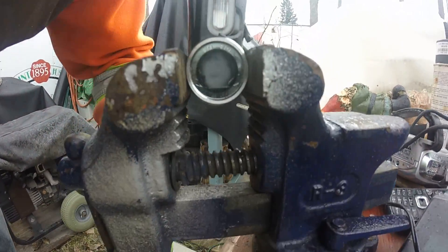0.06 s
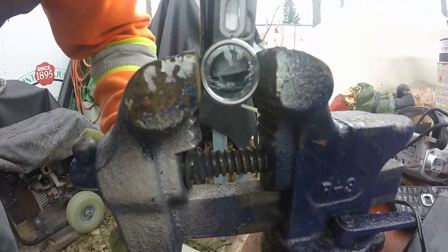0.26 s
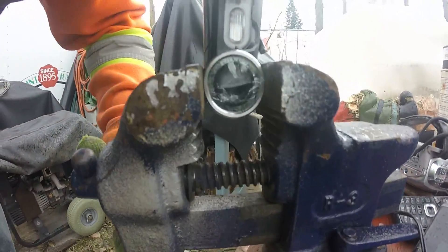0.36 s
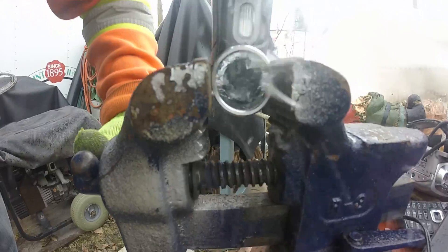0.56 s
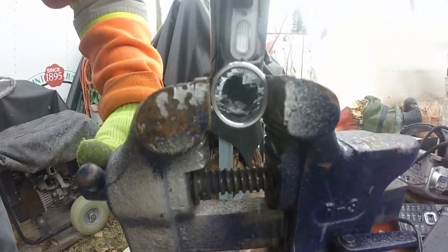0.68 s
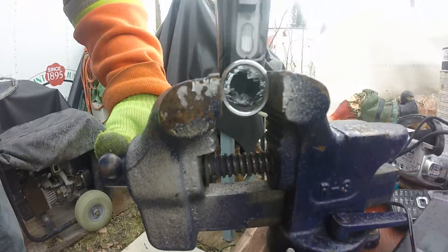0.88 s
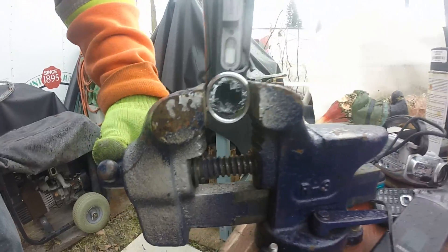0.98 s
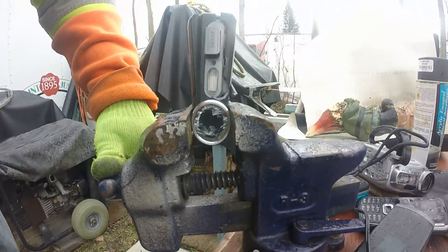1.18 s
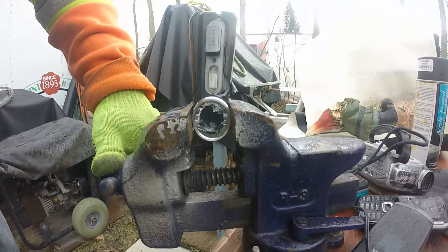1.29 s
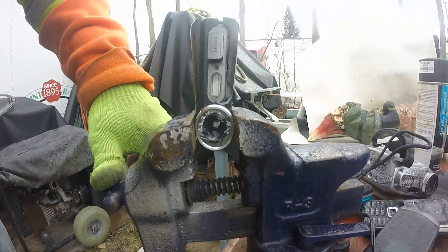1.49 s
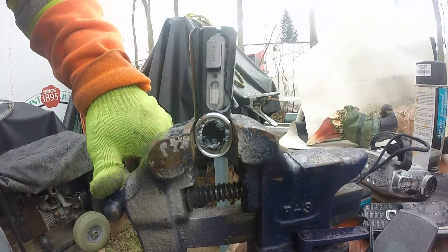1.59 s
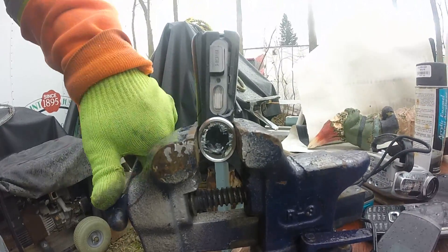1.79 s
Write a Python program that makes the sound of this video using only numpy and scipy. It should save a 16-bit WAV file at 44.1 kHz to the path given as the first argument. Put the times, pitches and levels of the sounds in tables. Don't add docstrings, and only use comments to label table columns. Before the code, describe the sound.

A camera lens barrel snaps and splinters in a metal vise, loose glass ticking, faint outdoor murmur

```python
import sys
import numpy as np
from scipy import signal
from scipy.fft import rfft, irfft, next_fast_len
from scipy.io import wavfile
from scipy.ndimage import map_coordinates

SR = 44100
rng = np.random.default_rng(int(sys.argv[2]) if len(sys.argv) > 2 else 0)


def to_linear_factor(level_db):
    exponent = np.asarray(level_db, float) / 20
    return 10 ** exponent


def waveform_to_disk(signal):
    frames = np.transpose(np.atleast_2d(signal))
    scaled = np.clip(frames, -1, 1) * 32767
    samples = np.round(scaled).astype(np.int16)
    wavfile.write(sys.argv[1], SR, samples)


N = 81585
T = np.arange(2048) / SR
LEAD_S = 0.0003


def unit(x):
    return x / np.sqrt(np.mean(x ** 2) + 1e-20)


def decay(t, t60):
    return to_linear_factor(-60 * t / t60)


def filtered(x, response):
    size = next_fast_len(x.shape[-1] + 8192)
    spectrum = rfft(x, size) * response(np.fft.rfftfreq(size, 1 / SR))
    return irfft(spectrum, size)[..., :x.shape[-1]]


def coloured(points, size):
    hz, db = np.transpose(points)
    noise = rng.standard_normal(size)
    return unit(filtered(noise, lambda f: to_linear_factor(np.interp(np.log(f + 1), np.log(hz + 1), db))))


def resonate(x, modes):
    def response(f):
        total = 0
        for k, (centre, width, db) in enumerate(modes):
            damping = 1j * f * width
            total = total + (-1) ** k * to_linear_factor(db) * damping / (centre * centre - f * f + damping)
        return total
    return filtered(x, response)


def add(track, start, db, sound):
    track[round(start * SR):][:len(sound)] += to_linear_factor(db) * sound / np.abs(sound).max()


def burst(t60, hold=0.):
    snap = 3.9 * (T == 0)
    return (rng.standard_normal(len(T)) + snap) * decay(np.maximum(T - hold, 0), t60)


# time in seconds, level in dB.
YARD_GAIN = [(0.0, -49.5), (0.107, -47), (0.236, -51.5), (0.293, -66), (0.52, -59), (0.675, -62),
             (0.952, -59.5), (1.292, -53.5), (1.592, -47.5), (1.85, -49.5)]


def gain_db():
    return np.interp(np.arange(N) / SR, *np.transpose(YARD_GAIN))


# frequency in Hz, level in dB.
MURMUR = [(12, -28.5), (20, -2.5), (92, -3), (196, -4), (427, -14), (700, -10), (1070, -23), (1600, -44.5)]
# frequency in Hz, density in dB per Hz.
HISS_COLOUR = [(600, -20), (1100, 0), (2500, -4), (5200, -12.5), (6600, -13.5), (9000, -25), (12500, -28),
               (15500, -48)]


def yard():
    lumps = map_coordinates(rng.standard_normal(40), [np.arange(N) * 14 / SR])
    murmur = coloured(MURMUR, N) * to_linear_factor(2.0 * lumps)
    hiss = coloured(HISS_COLOUR, N) * to_linear_factor(-14.5 + 0.6 * lumps)
    return to_linear_factor(gain_db()) * (murmur + hiss)


# start in seconds, length in seconds, level in dB, centre in Hz.
SLIDES = [(0.214, 0.02, -51, 2520), (0.25, 0.06, -57, 2120), (0.285, 0.017, -57, 8950),
          (0.483, 0.018, -59, 1870), (0.653, 0.036, -52, 1457), (0.678, .02, -56.5, 5030),
          (0.8, 0.017, -71, 3000), (0.985, 0.036, -62.5, 2500), (1.089, 0.021, -64, 2503),
          (1.121, 0.062, -63.5, 2098), (1.194, 0.018, -65.5, 4040), (1.231, 0.014, -63.5, 2460),
          (1.32, 0.015, -58.5, 2960), (1.333, 0.015, -66, 9970)]


def scrapes():
    out = np.zeros(N + SR)
    grit_db, q, size = 6.5, 0.77, 4096
    for start, length, db, hz in SLIDES:
        u = np.arange(size) / SR / length
        grit = to_linear_factor(grit_db * map_coordinates(rng.standard_normal(70), [np.arange(size) / 64]))
        mode = [(hz, hz / q, 0)]
        noise = unit(resonate(resonate(grit * rng.standard_normal(size), mode), mode))
        swell = np.minimum(8 * u, 1) * np.exp(-2 * u ** 2)
        out[round(start * SR):][:size] += to_linear_factor(db) * noise * swell
    return out[:N]


# start in seconds, peak level in dB.
NUDGES = [(.981, -58.5), (0.987, -57), (1.2735, -59), (1.324, -49.5), (1.3318, -36.5), (1.382, -53),
          (1.3989, -45), (1.4945, -34.5), (1.502, -59.5), (1.5348, -49.5), (1.6155, -47.5), (1.627, -58),
          (1.661, -59.5), (1.667, -53), (1.6875, -54.5), (1.7825, -56), (1.823, -65.5)]
# frequency in Hz, width in Hz, level in dB.
GLASS_MODES = [(6560, 416, 4), (9770, 540, -13.5), (12330, 900, -17)]


def chinks():
    out = np.zeros(N + SR)
    for start, db in NUDGES:
        contact = burst(0.0023) + 8 * (T == 0)
        ring = resonate(contact, GLASS_MODES)
        add(out, start - LEAD_S, db, resonate(ring, [(8000, 9000, 0)]))
    return out[:N]


# frequency in Hz, width in Hz, level in dB.
BARREL_MODES = [(1390, 830, -7.5), (2190, 800, -12), (3256, 660, -3.5), (5410, 450, 1), (6500, 1100, -7.5),
                (9410, 1140, -7.5), (12850, 2400, -9.5)]


def leaning(hz, db_per_oct):
    return [(c, w, db - db_per_oct * abs(np.log2(c / hz))) for c, w, db in BARREL_MODES]


def faint_crackle():
    level, ticks = gain_db(), []
    for when, chance, pitch in rng.random((110, 3)):
        db = level[int(when * N)] - 13 - 1.5 * np.log(chance)
        ticks.append((when * N / SR, db, 2000 * 6.6 ** pitch))
    return ticks


# start in seconds,
# peak level in dB, pitch in Hz.
SPLINTER_TICKS = [(0.1781, -29, 12000), (0.1835, -31.5, 9300), (0.262, -30.5, 9350), (0.2799, -39, 10200),
                  (0.2849, -33, 10240), (0.2891, -44, 5420), (0.3105, -57, 10270), (0.3149, -57, 9400),
                  (0.3367, -61, 5510), (0.3492, -63, 9330), (0.3587, -47.5, 3460), (0.3905, -40, 9330),
                  (0.456, -51.5, 6260), (0.4876, -33, 9350), (0.533, -52, 4800), (0.5526, -45, 9260),
                  (0.5892, -44.5, 9230), (0.6797, -44.5, 4320), (0.6886, -47.5, 4720), (0.7043, -56, 4160),
                  (0.7251, -48.5, 8870), (0.7379, -58, 3110),
                  (0.805, -58.5, 2850), (0.9358, -54, 3400), (0.9807, -57.5, 2802), (0.9874, -54, 2590),
               (1.0074, -48, 2056), (1.0582, -57.5, 2020), (1.0931, -53, 2020), (1.1257, -45.5, 1790),
               (1.1354, -45, 1867), (1.1506, -50, 2705), (1.1596, -48, 5390), (1.166, -45, 5020),
               (1.2002, -51, 5040), (1.2131, -52, 5054), (1.2355, -43, 1940), (1.2511, -55, 5810),
               (1.279, -46, 5800), (1.313, -49, 5770), (1.3255, -56, 9720), (1.3326, -52, 9500),
               (1.4386, -42, 2120), (1.5757, -56, 8010), (1.576, -52.5, 12000), (1.338, -52, 10500),
               (1.313, -59, 13000), (1.016, -60, 10000), (1.0422, -61.5, 9000), (1.085, -60, 9600),
               (1.096, -58.5, 3520), (1.1135, -62, 5200), (1.119, -55.5, 5000), (1.125, -60, 5630),
               (1.369, -61, 11500), (1.39, -52, 1900), (1.251, -60, 11900), (1.238, -58, 4500),
                  (0.19, -46, 11000), (0.196, -33, 10600), (.2225, -37, 3300), (0.225, -36, 5550),
               (.2415, -49, 3000), (0.2683, -44.5, 3530), (.57, -64, 8000), (.58, -53, 9040),
               (.6265, -55, 6080), (.682, -61, 3467), (1.07, -60, 8006), (1.332, -43, 2697),
               (.2225, -44, 13500), (.2225, -38, 7500), (.229, -48.5, 9000), (0.2994, -56, 10000),
               (0.3585, -55, 9100), (.43, -59, 6830), (.533, -58.5, 2300), (.693, -57.5, 6180),
               (.7125, -64, 5600), (0.7252, -53.5, 3600), (0.7257, -54, 6000), (.6885, -49, 9010),
               (.798, -62, 9060), (.793, -61.5, 2003)]


def splinters():
    out = np.zeros(N + SR)
    q, partner, partner_db, body_db = 9, 0.68, -9, -8
    for start, db, hz in [*SPLINTER_TICKS, *faint_crackle()]:
        own = [(hz, hz / q, 0), (partner * hz, hz / q, partner_db)]
        body = [(c, w, g + body_db) for c, w, g in leaning(hz, 11)]
        add(out, start - LEAD_S, db, resonate(burst(0.0021), own + body))
    return out[:N]


# start in seconds, peak level in dB, extra first snap, bench ring in dB.
JAW_JOLTS = [
    (0.8379, -12, 11.8, -25),
    (1.422, -11.5, 6.1, -20),
]
# frequency in Hz, width in Hz, level in dB.
JAW_MODES = [
    [(1970, 230, -6.5), (2700, 300, -7), (3600, 190, -8.5), (4680, 290, 2), (6600, 610, -3),
     (7480, 260, -4), (8780, 400, -7.5), (11300, 610, -13), (13500, 850, -14.5)],
    [(701, 130, -2), (1590, 260, -1.5), (2500, 310, -3), (3700, 220, -7), (4520, 300, -6.5), (6300, 450, 0),
     (9360, 320, -7), (11500, 790, -17.5), (14300, 280, -36)],
]
# frequency in Hz, level in dB.
SCATTER_COLOUR = [(120, -35), (280, -17.5), (600, -9.5), (2500, -7.5), (5500, -11.5), (9000, -20),
                  (15500, -38)]


def jolts():
    out, t = np.zeros(N + SR), np.arange(SR // 4) / SR
    bench_hz, bench_t60, bench_rise_s = 982, 0.035, 0.0078
    for (start, db, snap, ring_db), modes in zip(JAW_JOLTS, JAW_MODES):
        add(out, start, db, resonate(burst(0.011, 0.00047) + snap * (T == 0), modes))
        swell = 1 - np.exp(-(t / bench_rise_s) ** 4)
        ring = decay(t, bench_t60) * np.sin(2 * np.pi * bench_hz * t) * swell
        add(out, start, db + ring_db, ring)
        fade = decay(t, 0.057) + to_linear_factor(-25) * decay(t, 0.23)
        add(out, start, db - 12, coloured(SCATTER_COLOUR, len(t)) * fade)
    return out[:N]


# start in seconds,
# peak level in dB, pitch in Hz, t60 in seconds.
STRUCK_RINGS = [(0.2026, -15, 747, 0.011), (.207, -26, 760, 0.016), (.2115, -21, 811, 0.013),
                (.2135, -18.5, 773, 0.012), (0.2446, -17, 1364, 0.0054), (.602, -31, 748, 0.013),
                (0.604, -8, 735, .012), (.6065, -25, 727, 0.0063), (.646, -21.5, 890, 0.013),
                (1.0938, -40.5, 589, 0.037), (1.123, -39.5, 617, 0.029), (.2025, -12.5, 1776, 0.007),
                (0.2028, -12.5, 2680, 0.0057), (0.6462, -13.5, 2330, 0.0058), (0.215, -34, 3260, .03),
                (0.231, -47, 850, 0.012), (0.246, -44.5, 3270, 0.035), (0.2678, -51, 720, 0.0207),
                (0.289, -65, 2500, 0.08), (.6535, -37, 700, .02), (0.67, -46, 516, 0.021),
                (1.209, -53, 698, .03), (.2447, -7, 5460, .005), (0.2454, -7, 5440, .005),
                (0.3908, -46, 6200, 0.0044), (0.4867, -41.5, 6300, 0.0053), (.842, -50, 260, 0.053),
                (1.4222, -38, 487, 0.021), (1.2, -53, 5000, 0.0059), (0.2022, -8, 12410, .002)]


def thumps():
    out = np.zeros(N + SR)
    for start, db, hz, t60 in STRUCK_RINGS:
        onset = 1 - np.exp(-T / 0.00057)
        add(out, start, db, -np.sin(2 * np.pi * hz * T) * decay(T, t60) * onset)
    return out[:N]


# start in seconds, peak level in dB, length in seconds, push 1 or pull -1.
AIR_PUFFS = [
    (0.2446, -20, 0.0016, 1),
    (.6048, -23, 0.003, -1),
    (0.6455, -25, 0.0012, -1),
    (.2105, -32, 0.0024, -1),
]


def puffs():
    out = np.zeros(N + SR)
    for start, db, length, way in AIR_PUFFS:
        u = T / length
        add(out, start, db, way * u * (1 - 1.29 * u) * np.exp(-2.2 * u))
    return out[:N]


# start in seconds, peak level in dB, strongest pitch in Hz, t60 of the tearing in seconds.
BREAKS = [(0.2016, -20, 9100, .004), (0.2025, -2.5, 4235, 0.0025), (0.2036, -7, 5490, 0.0045),
          (0.2073, -9, 8980, 0.014), (0.2089, -7.5, 5650, 0.011), (0.2114, 1, 3150, 0.0092),
          (0.213, -6, 3270, 0.0025), (0.215, -21.5, 3340, 0.0079), (.2175, -27.5, 2940, 0.005),
          (0.2448, -9.5, 5490, 0.0056), (0.2456, -3.5, 5550, 0.0031), (0.5992, -19, 6000, 0.011),
          (.602, -11.5, 5410, .01), (.6035, -6.5, 3547, 0.012), (0.6049, -4.5, 3510, 0.006),
          (.606, -3, 5290, 0.0028), (0.606, -8, 4460, 0.0018), (0.6364, -27.5, 3350, 0.02),
          (0.6412, -25.5, 5440, 0.011), (.6429, -4, 4980, 0.0051), (0.6463, -6, 2328, 0.0038),
          (0.6469, -10.5, 3433, 0.0059), (0.649, -21.5, 5520, 0.011), (0.653, -15, 4500, 0.0035)]


def fractures():
    out = np.zeros(N + SR)
    for start, db, hz, t60 in BREAKS:
        tearing = burst(t60, hold=0.00073)
        add(out, start, db, resonate(tearing, leaning(hz, 3.5)))
    return out[:N]


def echo(x):
    t = np.arange(SR // 8) / SR
    tail = rng.standard_normal(len(t)) * decay(t, 0.03)
    return signal.fftconvolve(x, tail / np.linalg.norm(tail))[:N]


def scene():
    cracks = fractures() + thumps() + puffs()
    ticks = splinters() + chinks()
    answer = echo(to_linear_factor(-37) * cracks + to_linear_factor(-16.5) * ticks)
    return (cracks + ticks + answer + jolts() + scrapes() + yard())[None]


# frequency in Hz, level in dB.
MIC_RESPONSE = [(9000, -0.5), (13000, -2), (15000, -5), (15400, -22), (16450, -23.5), (16600, -88.5)]


def microphone(dry):
    hz, db = np.transpose(MIC_RESPONSE)
    heard = filtered(dry, lambda f: to_linear_factor(np.interp(f, hz, db)))
    return heard / (1 + np.abs(heard / 1.05) ** 6) ** (1 / 6)


def low_pass(x):
    return signal.sosfilt(signal.butter(12, 16520, fs=SR, output="sos"), x)


def record(dry):
    mix = microphone(dry)
    return low_pass(mix)


dry = scene()
out = record(dry)
waveform_to_disk(out)
```